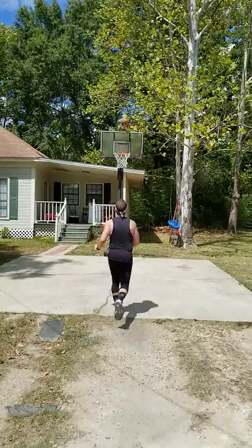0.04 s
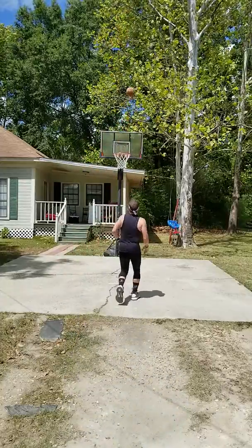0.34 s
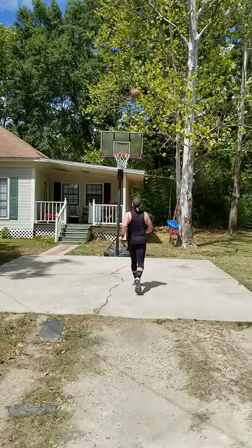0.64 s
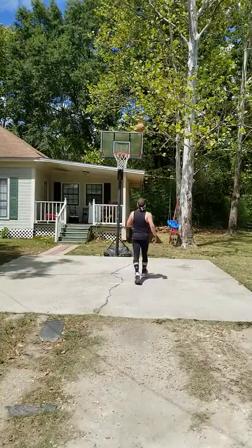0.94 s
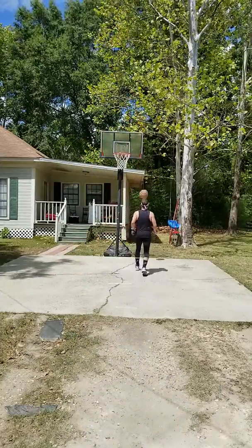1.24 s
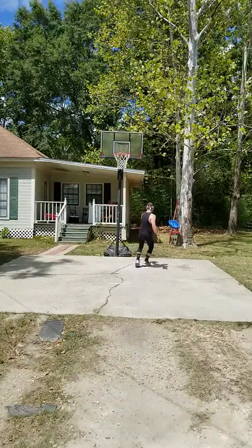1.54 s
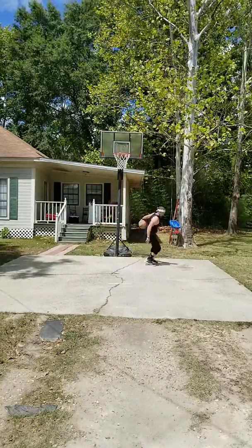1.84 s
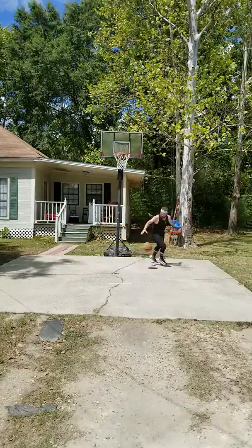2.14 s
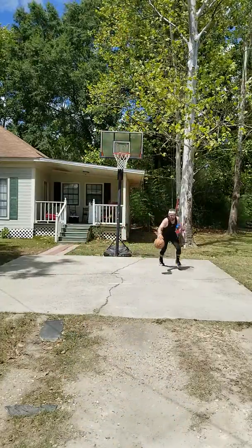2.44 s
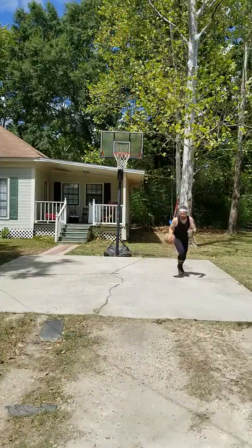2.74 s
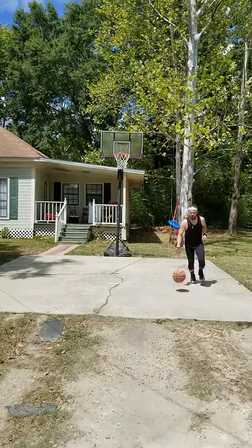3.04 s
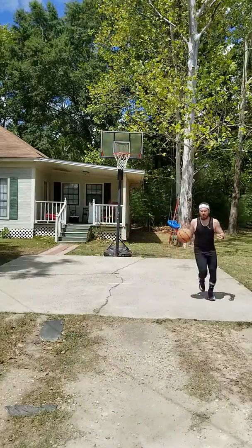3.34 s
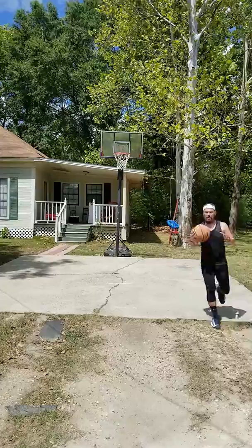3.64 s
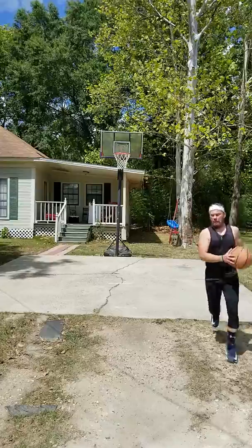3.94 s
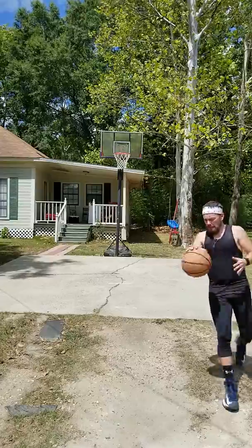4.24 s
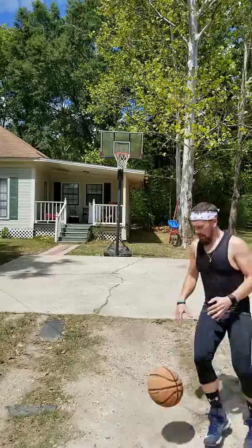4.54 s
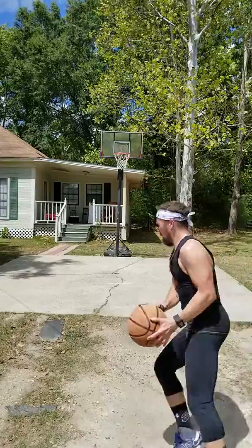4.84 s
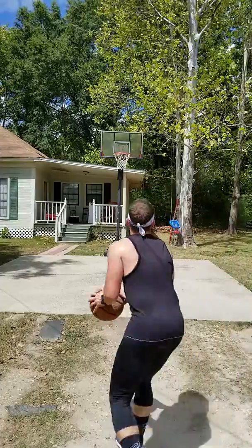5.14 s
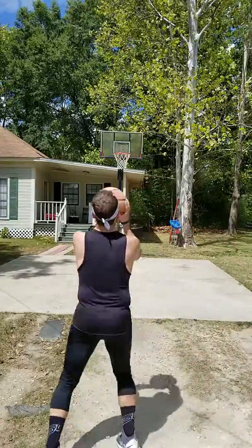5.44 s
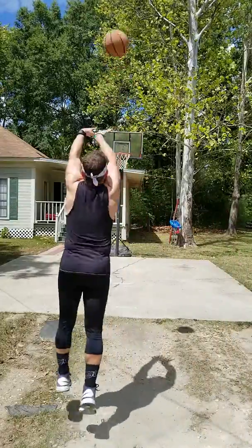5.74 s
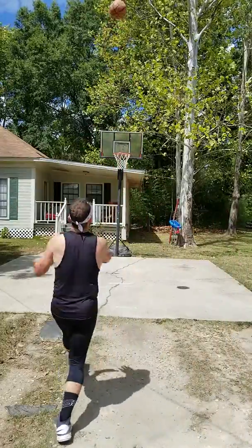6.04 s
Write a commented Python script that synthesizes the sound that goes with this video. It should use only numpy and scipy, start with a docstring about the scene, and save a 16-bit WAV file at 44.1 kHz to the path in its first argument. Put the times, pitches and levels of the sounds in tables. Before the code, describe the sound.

A hoop shudders, then a basketball thuds on a driveway, coming closer, followed by gritty footsteps and a faint bird call.

```python
"""A concrete driveway, heard from a phone at its gravel end. The hoop still shudders from a shot;
the player takes the rebound, dribbles a basketball five times towards the phone, scuffs round on
the grit and shoots again. Each contact slaps the skin, squashes the ball and rings the air inside.
House and trees throw the bounces back; leaves hiss, traffic rumbles far off and a bird calls."""
import sys
import numpy as np
from scipy import signal
from scipy.fft import rfft, irfft, next_fast_len
from scipy.io import wavfile
from scipy.ndimage import uniform_filter1d, map_coordinates

SR = 44100
rng = np.random.default_rng(int(sys.argv[2]) if len(sys.argv) > 2 else 0)


def file_out(sig):
    """Save sig as 16-bit WAV at sys.argv[1]."""
    # one column per channel
    cols = np.atleast_2d(sig).T
    # limit, then scale
    lim = np.clip(cols, -1, 1)
    pcm = np.round(lim * 32767).astype(np.int16)
    wavfile.write(sys.argv[1], SR, pcm)


N = 268997
T = np.arange(N) / SR
LEAD_S = .002  # run-in ahead of a contact

# player's path: time_s, distance_m, left_lag_samples
PLAYER_PATH = [(0, 5, 1), (1.47, 14.4, 4.4), (3.08, 8, 4.58), (4.47, 6, 10.7), (5.1, 5.7, 13.15),
               (6.1, 3.5, 1.2)]


def undb(db):
    """Decibels to gain."""
    return 10 ** (np.asarray(db) / 20)


def curve(rows):
    """Columns of (time_s, ...) rows at every sample."""
    time_s, *columns = np.transpose(rows)
    return [np.interp(T, time_s, column) for column in columns]


def colour(x, points, power=1):
    """Filter by (freq_hz, gain_db) points; power scales the dB."""
    hz, db = np.transpose(points)
    size = next_fast_len(x.shape[-1] + 2048)
    bins_hz = np.maximum(np.arange(size // 2 + 1) * SR / size, 1)
    gain = undb(power * np.interp(np.log(bins_hz), np.log(hz), db))
    return irfft(rfft(x, size) * gain, size)[..., :x.shape[-1]]


def unit(x):
    """Scale to rms 1."""
    return x / np.sqrt(np.mean(x ** 2))


def walk(rate_hz):
    """Smooth random drift, spread near 1."""
    hold = int(SR / rate_hz)
    return 1.33 * uniform_filter1d(np.repeat(rng.standard_normal(N // hold + 1), hold), hold)[:N]


def ring(modes, t, pitch=1):
    """Struck modes dying away."""
    return sum(undb(db - 60 * t / t60) * np.sin(2 * np.pi * hz * pitch * t) for hz, db, t60 in modes)


def add(track, start_s, sound):
    """Mix a sound into a track."""
    i = int(start_s * SR)
    track[..., i:i + sound.shape[-1]] += sound[..., :N - i]


def ports(x):
    """The player is on the right, so sound reaches the left microphone port later."""
    _, lag = curve(PLAYER_PATH)
    return np.array([map_coordinates(x, [np.arange(N) + side * lag / 2], order=3) for side in (-1, 1)])


def diffuse():
    """Noise from all round: alike at both ports in the bass, unrelated in the treble."""
    # stereo width: freq_hz, side_minus_mid_db
    width = [(60, -12), (130, -24), (380, -12), (700, -12), (1290, -3.5), (2380, 0.5), (15000, -1)]
    mid, side = rng.standard_normal((2, N))
    return mid + np.array([[1], [-1]]) * colour(side, width)


def surroundings(rumble_db=-50, leaves_db=-56, split_hz=1800, gust_db=3, gust_s=1.6):
    """Far traffic rumbles and leaves hiss; a gust dies away at the start."""
    # outdoor noise: freq_hz, gain_db
    spectrum = [(20, -17), (30, -16), (53, 1), (92, -5.5), (120, 6), (149, -10.5), (190, -7), (293, -11),
                (489, -12), (641, -10.5), (1050, -15), (2220, -27), (4870, -27), (9000, -41), (15000, -46)]
    swell_db = gust_db * np.exp(-(T / gust_s) ** 2)
    air = colour(diffuse(), spectrum)
    low = None
    low = signal.sosfiltfilt(signal.butter(2, split_hz, fs=SR, output="sos"), air)
    rumble = unit(low) * undb(rumble_db + swell_db - 2.36 * walk(3.48))
    leaves = unit(air - low) * undb(leaves_db + swell_db + 0.69 * walk(6))
    return rumble + leaves


def bird(held_hz=2404, settle_s=0.016, droop_s=.016, fade_s=0.015, fifth_db=-5, waver=0.01):
    """A far, nasal two-note cry, harmonics 4 and 5 only; each note glides to one pitch and droops."""
    # calls: start_s, level_db
    calls = [(1.73, -66), (3.30, -63), (5.54, -51.5), (5.917, -55)]
    # notes of a call: delay_s, length_s, start_offset_hz, end_offset_hz, gain_db
    notes = [(0, .155, 624, -330, 0.5), (.175, 0.079, -330, -35, 5)]
    glide_hz, envelope = np.zeros(N), np.zeros(N)
    for start_s, db in calls:
        for delay_s, length_s, start_hz, end_hz, note_db in notes:
            t = T[:int(length_s * SR)]
            bend_hz = start_hz * np.exp(-t / settle_s) + end_hz * np.exp((t - length_s) / droop_s)
            fade = np.minimum(np.minimum(t, length_s - t) / fade_s, 1)
            add(glide_hz, start_s + delay_s, bend_hz)
            add(envelope, start_s + delay_s, undb(db + note_db) * fade)
    phase = 2 * np.pi * np.cumsum((held_hz + glide_hz) * (1 + waver * walk(200))) / SR
    tone = np.sin(phase) + undb(fifth_db) * np.sin(phase * 5 / 4)
    return envelope * undb(3.4 * walk(70)) * tone / 2


def yard(x, scatter_db=-18, t60_s=0.57, build_s=0.017, smear_s=0.0077, wall_boost_db=4.0):
    """Distinct echoes from house and trunks, and a scattered tail from the foliage."""
    # reflections: delay_s, level_db
    walls = [(0.029, -50), (0.059, -42.5), (0.08, -34.5), (.094, -36.5), (0.136, -50)]
    # echo colour: freq_hz, gain_db
    spectrum = [(60, 1), (110, 3.5), (190, -0.5), (330, 0), (600, 2.5), (1200, 3.5), (2500, 2.5),
                (5000, 10), (9000, 4), (15000, 12)]
    t = T[:SR]
    tail = diffuse()[:, :SR] * undb(-60 * t / t60_s) * (1 - np.exp(-(t / build_s) ** 2))
    response = undb(scatter_db) * unit(tail) / np.sqrt(SR)
    for delay_s, db in walls:
        burst = rng.standard_normal(SR) * (t > delay_s) * np.exp(-np.abs(t - delay_s) / smear_s)
        response = response + undb(db + wall_boost_db) * unit(burst) / np.sqrt(SR)
    return signal.fftconvolve(x[None], colour(response, spectrum), axes=1)[:, :N]


def hoop(rattle_db=-33, rattle_t60_s=0.71, shake_db=2.5):
    """Rim, board and pole ring out unevenly while the loose fittings rattle."""
    # rim, board and pole: freq_hz, level_db, t60_s
    modes = [(108.3, -36.5, 1.43), (160, -38.5, 0.49), (276, -31, 0.86), (296, -50, 1.2), (391, -40, 0.4),
             (414, -37.5, 0.55), (509, -52, 1.1), (570, -49, 0.48), (770, -50, 0.43), (900, -50, 0.52),
             (1080, -42, 0.15), (1160, -43.5, 0.19), (1420, -50, 0.32), (1800, -54, 0.48)]
    # rattle colour: freq_hz, gain_db
    fittings = [(60, -9), (200, -3), (420, -7), (650, -12), (1200, -14.5), (2200, -20), (4200, -22),
                (7000, -26.5), (9500, -38.5), (15000, -41)]
    rattle = unit(colour(diffuse(), fittings)) * undb(rattle_db - 60 * T / rattle_t60_s + 2 * walk(64))
    return sum(ring([mode], T) * undb(shake_db * walk(32.4)) for mode in modes) + rattle


def stones():
    """Small stones snap under a sole and ring for a few milliseconds."""
    # snaps: start_s, level_db, pitch_ratio
    snaps = [(2.233, -49, .75), (2.8695, -33.5, 0.75), (4.8745, -50, 1.2), (5.054, -49, 1.5),
             (5.131, -45, 1.2), (5.2441, -52, 0.38), (5.4486, -23.5, 0.94)]
    # stone modes: freq_hz, gain_db, t60_s
    modes = [(3380, -1, 0.013), (3580, -3, 0.0087), (3650, -22, 0.0078), (6660, -5, 0.011)]
    track = np.zeros(N)
    for start_s, db, pitch in snaps:
        add(track, start_s, undb(db) * ring(modes, T[:SR // 20], pitch))
    return track


def sole_pressure(step_rise_ratio=0.42, step_heel_db=5.5, slide_rise_ratio=1.21, slide_sand_db=-10.5):
    """Envelopes of grit, heel and sand: a step lands abruptly, a slide swells and fades."""
    # footfalls: peak_s, fall_s, grit_db, sand_over_grit_db
    steps = [(.274, 0.013, -53.5, 3), (1.571, 0.0058, -40.5, -23), (1.835, .02, -65, 4),
             (2.235, 0.0079, -58, -17), (2.871, 0.015, -58.5, -12), (3.731, 0.0063, -57, 4),
             (4.239, 0.021, -36.5, -16), (4.332, 0.018, -52, -5), (4.423, 0.033, -39, -14),
             (4.56, 0.032, -51, -18), (4.787, 0.016, -47, -9), (4.83, 0.019, -38, -14),
             (5.048, 0.0086, -48.5, -12), (5.245, 0.0035, -45.5, -3), (5.627, 0.013, -64.5, 9),
             (5.875, 0.029, -52, -9)]
    # sliding soles: peak_s, fall_s, grit_db, heel_over_grit_db
    slides = [(1.606, 0.017, -42.5, 1), (4.216, 0.014, -47, 11.5), (4.622, 0.014, -44, 4.5),
              (4.658, 0.016, -42.5, 14), (4.765, 0.024, -48, -2), (4.891, 0.032, -40.5, 2),
              (5.022, 0.033, -43.5, 1), (5.167, 0.033, -49, 8), (5.265, 0.025, -52, 1)]
    scuffs = [(s, step_rise_ratio * fall, fall, db, step_heel_db, sand) for s, fall, db, sand in steps]
    scuffs += [(s, slide_rise_ratio * fall, fall, db, heel, slide_sand_db)
               for s, fall, db, heel in slides]
    push = np.zeros((3, N))
    t = np.arange(-SR // 8, SR // 8) / SR
    for peak_s, rise_s, fall_s, db, heel_db, sand_db in scuffs:
        envelope = np.exp(-(t / np.where(t < 0, rise_s, fall_s)) ** 2)
        add(push, peak_s + t[0], np.outer(undb([db, db + heel_db, db + sand_db]), envelope))
    return push


def shoes(grain_db=3.0, grains_per_s=2200, spread=0.8):
    """A sole lands with a dull heel sound and drags grit and fine sand: dense, uneven clicks."""
    # scuff colours: freq_hz, gain_db
    grit = [(500, -5), (1200, 1), (1900, 9.5), (3300, 3.5), (5200, 0), (7000, -1.5), (9000, -38),
            (15000, -61)]
    heel = [(80, -10), (200, 0), (400, 2), (750, 2), (1300, 1.5), (2200, -17), (5000, -33)]
    sand = [(3000, -33), (6500, 13), (9000, 7.5), (12500, 7.5), (16000, 2.5)]
    track = 0
    slips = undb(2.0 * walk(180))  # the sole catches and slips
    for tone, push in zip((grit, heel, sand), sole_pressure()):
        sizes = undb(grain_db * np.minimum(rng.exponential(size=(3, N)), 4))
        hits = rng.random((3, N)) < grains_per_s / SR
        grains = unit(colour(sizes * hits * rng.standard_normal((3, N)), tone)) * push * slips
        track = track + ports(grains[0]) + spread * (tone is not heel) * grains[1:]
    return track


def squeak(peak_s=4.248, width_s=0.0098, centre_hz=1750, glide_per_s=9, level_db=-31):
    """The palm slips on the rubber as it pushes the ball down: a brief, rising chirp."""
    pitch_hz = centre_hz * (1 + glide_per_s * np.clip(T - peak_s, -.03, .03) + 0.025 * walk(430))
    envelope = undb(level_db) * np.exp(-((T - peak_s) / width_s) ** 2)
    return envelope * np.sin(2 * np.pi * np.cumsum(pitch_hz) / SR)


def contact(slap_db, slap_s, dent_db, thump_db, thump_hz, thump_s, swell_s, ring_db, pitch,
            crack_db, crack_s, grit_db, grit_s, snap_db, lift_db, lift_s, off_s,
            dent_s=0.00044, thump_delay_s=0.001, ring_delay_s=0.0002, again_db=-14, ring_sent_db=-6):
    """The skin slaps and dents, the ball squashes, its air rings. Returns (direct, sent to the yard)."""
    # air and skin of the ball: freq_hz, gain_db, t60_s
    modes = [(230, -7.5, .04), (323, -7, 0.051), (410, -10, 0.1), (876, -3.5, 0.026), (1136, -3, .038),
             (1255, 0.5, 0.025), (1370, -11, 0.023), (1610, -14, 0.022), (1830, -8, 0.028),
             (2350, -9, 0.024)]
    # sharp edge of a contact: freq_hz, gain_db
    edge = [(300, -32), (1700, 24), (2800, 11), (4100, 10), (5200, 0), (6900, 6), (9000, -12), (15000, -13)]
    t = np.arange(SR // 3) / SR - LEAD_S
    after, squash, inside, lifted = (np.maximum(t - s, 0) for s in (0, thump_delay_s, ring_delay_s, off_s))
    dent = undb(dent_db) * np.exp(-(t / dent_s - 1) ** 2)
    slap = -undb(slap_db) * (np.exp(-(t / slap_s) ** 2) + dent)
    swell = (1 - np.exp(-squash / swell_s)) * np.exp(-(squash / thump_s) ** 2)
    thump = undb(thump_db) * swell * np.sin(2 * np.pi * thump_hz * squash)
    air = undb(ring_db) * ring(modes, inside, pitch)
    # a second snap at off_s rings the air again
    lift = undb(lift_db) * (np.exp(-np.abs(t - off_s) / lift_s)
                            - undb(again_db) * ring(modes, lifted, pitch))
    # a short crack, then crushed dust
    decay = np.exp(-after / crack_s) + undb(grit_db) * np.exp(-after / grit_s)
    crack = unit(colour(rng.standard_normal(len(t)), edge)) * (t > 0) * decay
    impulse = 1. * (np.abs(t) == np.abs(t).min())
    click = -colour(impulse, edge)
    click *= np.sqrt(crack_s * SR / 2 / np.sum(click ** 2))
    direct = slap + thump + lift + air + undb(crack_db) * (crack + undb(snap_db) * click)
    # mostly the first blow wakes the yard
    sent = slap + thump + undb(ring_sent_db) * air + undb(crack_db) * click
    return np.array([direct, sent])


def hands(palm_db=5.5, fingers_db=6.5, fingers_after_s=.006, highpass_hz=70):
    """Catches and pushes: the palm lands, then the fingers; a soft slap with little deep bass."""
    # hands on the ball: start_s, level_db, thump_over_ring_db, thump_hz, ring_pitch_ratio
    pats = [(1.3804, -31.5, 11.5, 160, 0.68), (2.7003, -51.5, 18, 335, 1), (3.2370, -49, 13, 325, 0.9),
            (3.554, -44.5, 12, 188, 0.91), (3.5890, -32.5, 9, 170, 0.87), (3.7328, -38.5, -3, 440, .9),
            (3.9100, -27, 6.5, 422, 1.4), (4.2300, -25, 5, 410, 1.304), (4.6572, -23, -13, 465, .93),
            (5.4487, -57.5, 23, 316, 0.54)]
    track = np.zeros((2, N))
    for start_s, db, thump_db, thump_hz, pitch in pats:
        add(track, start_s - LEAD_S, undb(db) * contact(
            slap_db=palm_db, slap_s=0.00028, dent_db=-19.5, ring_db=0, pitch=pitch,
            thump_db=thump_db, thump_hz=thump_hz, thump_s=0.0064, swell_s=0.00035,
            crack_db=-5, crack_s=0.0047, grit_db=-28, grit_s=.01, snap_db=-29,
            lift_db=fingers_db, lift_s=0.0006, off_s=fingers_after_s))
    return signal.sosfilt(signal.butter(1, highpass_hz, "high", fs=SR, output="sos"), track)


def bounces(contact_s=.0105, thump_cycles=0.72, lift_db_per_octave=21, highpass_hz=28):
    """The ball hits concrete and its skin pops back; a deeper squash thumps lower, snaps off harder."""
    # ground hits: start_s, level_db, slap_gain_db, crack_gain_db, thump_hz, ring_pitch_ratio
    hits = [(1.4746, -1, -3, -5, 135, .96), (2.0554, -3.5, -5.5, -13.5, 178, 0.96),
            (2.5626, -2, -1.5, -12, 173, 1.01), (3.0792, 1.54, -5, -14, 175, 1.04),
            (4.4704, 4, -6.5, -21, 128.6, 0.98)]
    track = np.zeros((2, N))
    for start_s, db, slap_db, crack_db, thump_hz, pitch in hits:
        lift_db = -15 + lift_db_per_octave * np.log2(174.4 / thump_hz)
        add(track, start_s - LEAD_S, undb(db) * contact(
            slap_db=slap_db, slap_s=0.00016, dent_db=-5.0, ring_db=-17, pitch=pitch,
            thump_db=0.5, thump_hz=thump_hz, thump_s=thump_cycles / thump_hz, swell_s=0.0015,
            crack_db=crack_db, crack_s=0.00073, grit_db=-14, grit_s=0.0066, snap_db=-7.5,
            lift_db=lift_db, lift_s=0.00057, off_s=contact_s))
    return signal.sosfilt(signal.butter(1, highpass_hz, "high", fs=SR, output="sos"), track)


def scene(echo_distance_m=9, bird_echo_db=5):
    """All sources in the yard; the farther the ball, the larger the share of its echoes."""
    distance_m, _ = curve(PLAYER_PATH)
    ball, sent = bounces() + hands()
    cry = bird()
    echoes = yard(sent * distance_m / echo_distance_m + undb(bird_echo_db) * cry)
    return ports(ball + stones() + squeak()) + shoes() + hoop() + cry + echoes + surroundings()


def record(dry, highpass_hz=30, lowpass_hz=16100):
    """The phone: left port duller at the very top, rumble cut, clipping at full scale, treble cut."""
    # port mismatch: freq_hz, left_minus_right_db
    mismatch = [(100, 0), (2400, 0.5), (4400, 3), (7000, 0), (9000, -4.5), (12000, -11), (16000, -7)]
    sound = np.array([colour(dry[0], mismatch, .5), colour(dry[1], mismatch, -.5)])
    sound = signal.sosfilt(signal.butter(2, highpass_hz, "high", fs=SR, output="sos"), sound)
    return signal.sosfilt(signal.ellip(8, .2, 70, lowpass_hz, fs=SR, output="sos"), np.clip(sound, -1, 1))


dry = scene()
out = record(dry)
file_out(out)
```